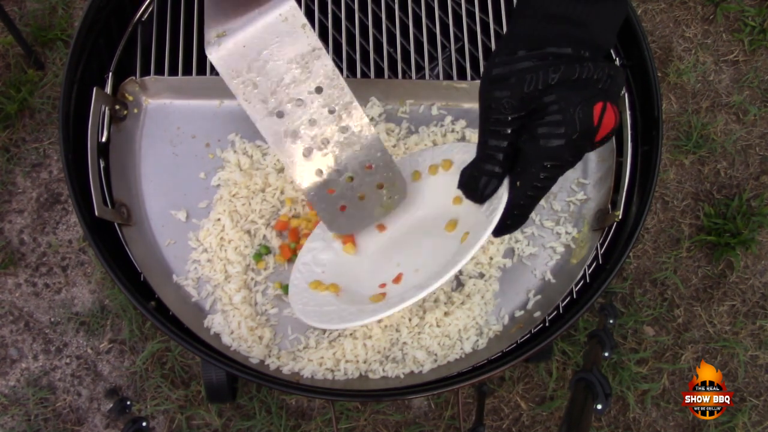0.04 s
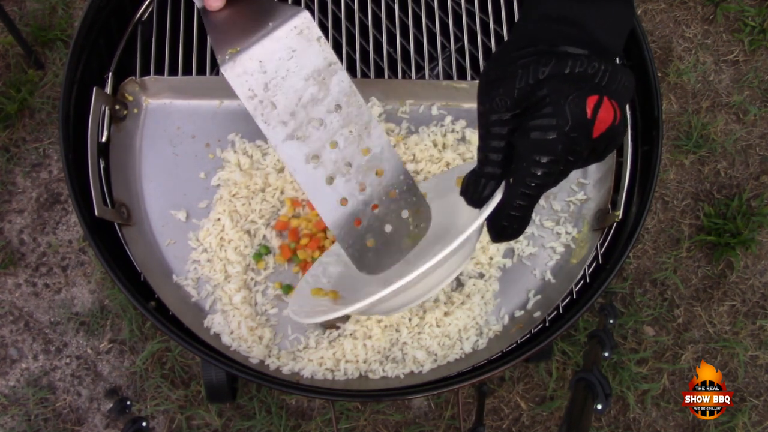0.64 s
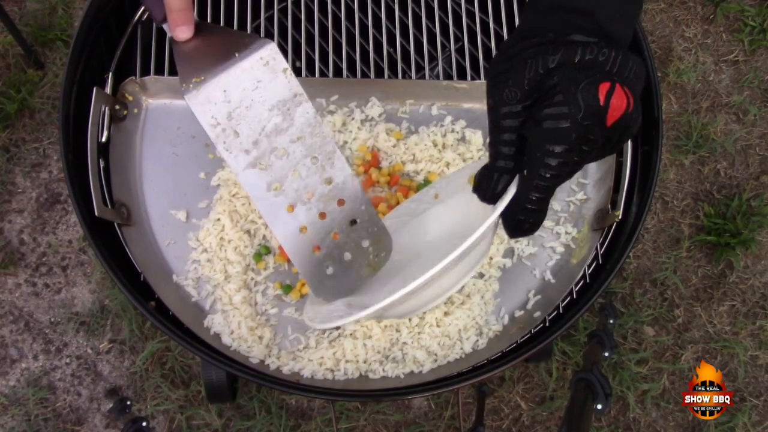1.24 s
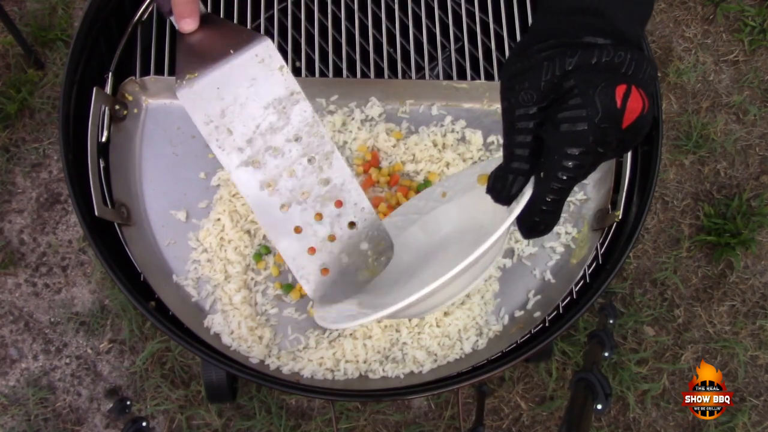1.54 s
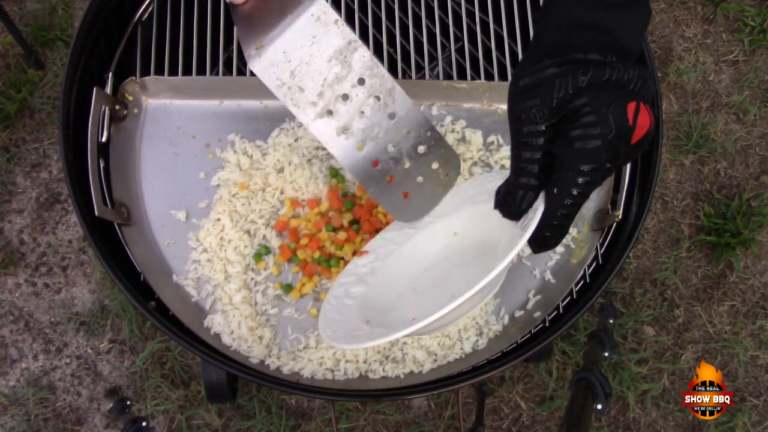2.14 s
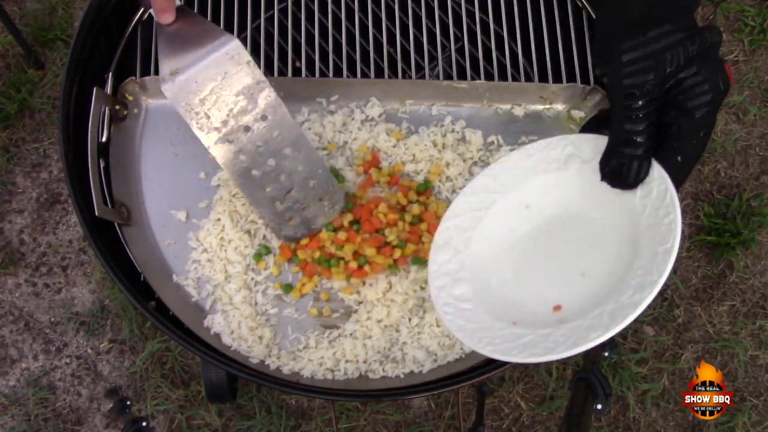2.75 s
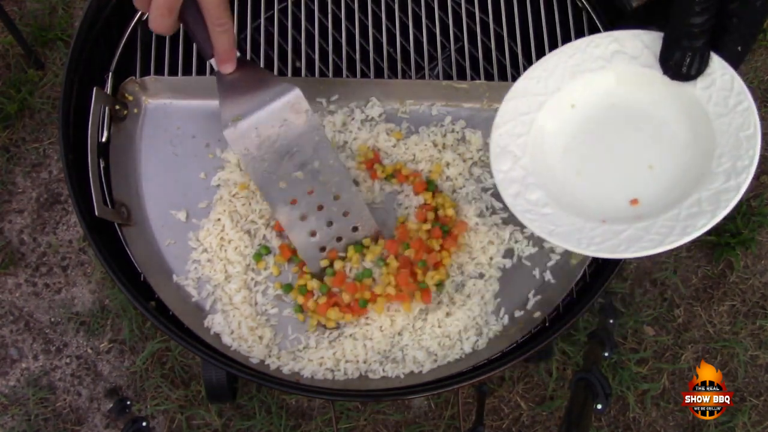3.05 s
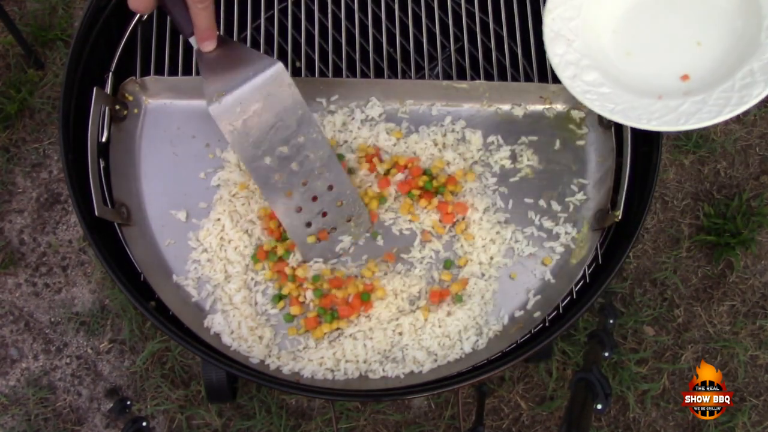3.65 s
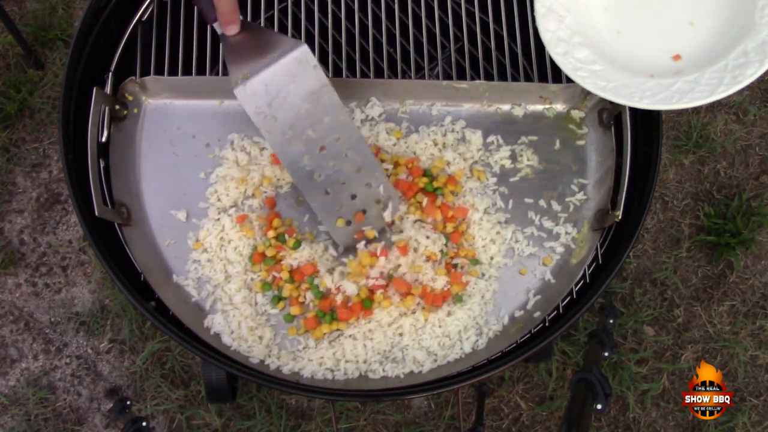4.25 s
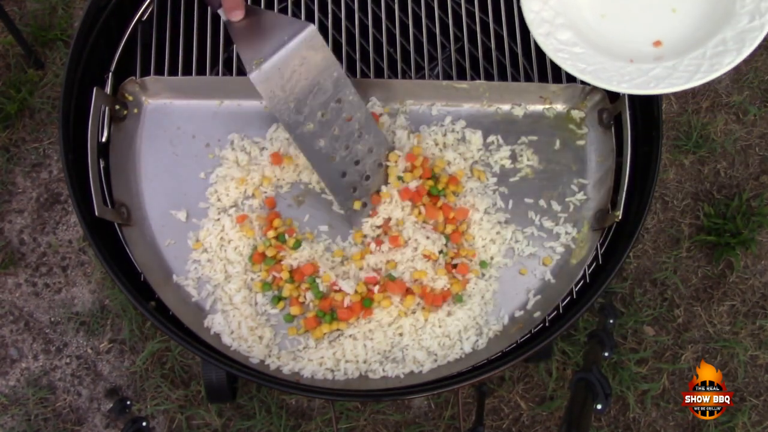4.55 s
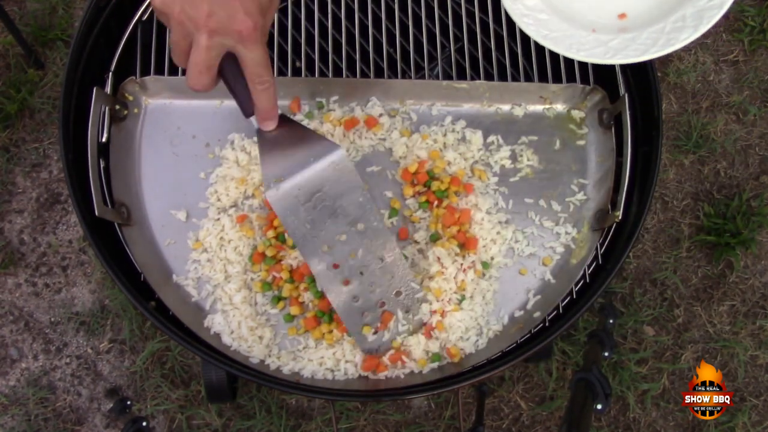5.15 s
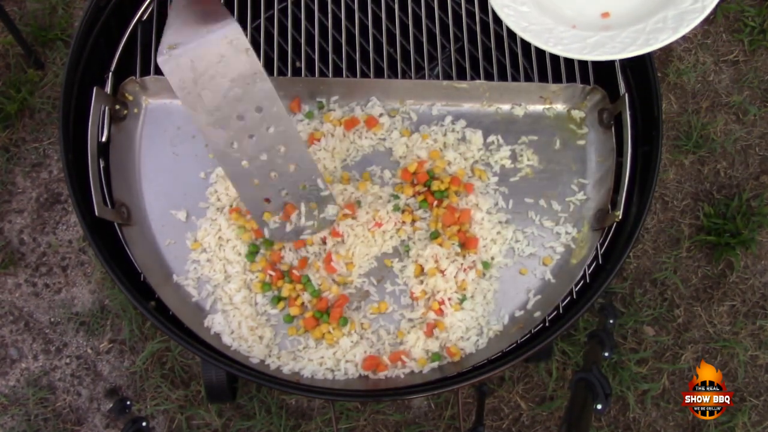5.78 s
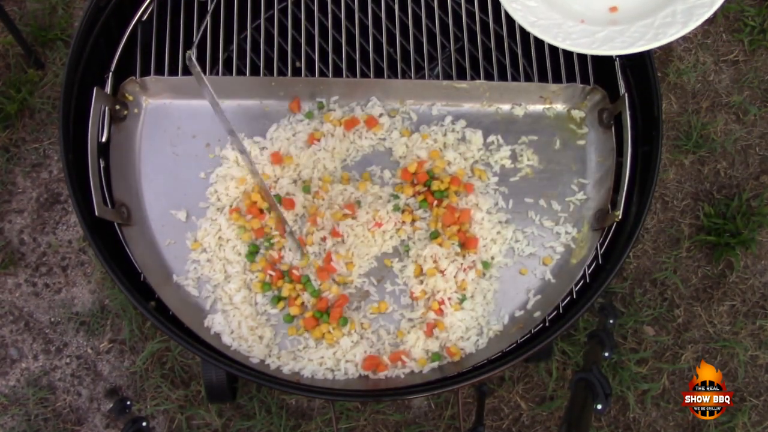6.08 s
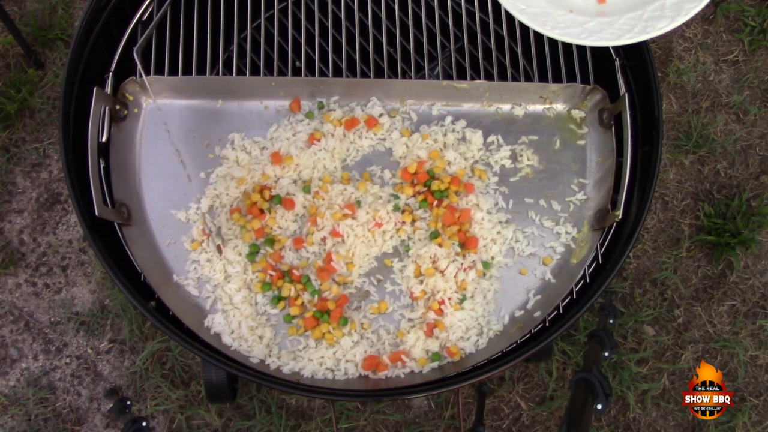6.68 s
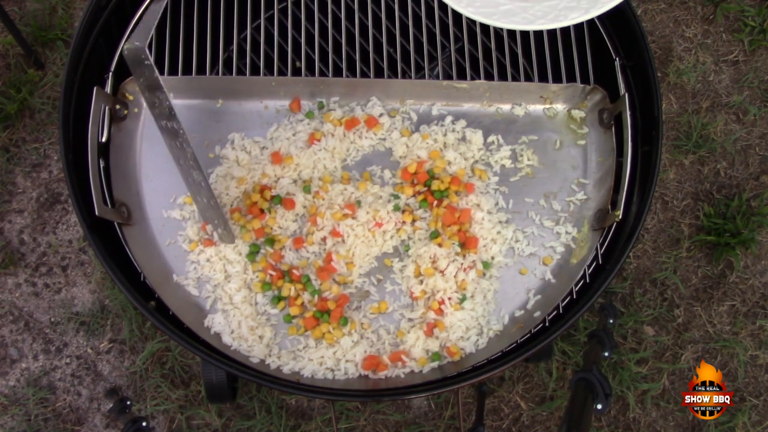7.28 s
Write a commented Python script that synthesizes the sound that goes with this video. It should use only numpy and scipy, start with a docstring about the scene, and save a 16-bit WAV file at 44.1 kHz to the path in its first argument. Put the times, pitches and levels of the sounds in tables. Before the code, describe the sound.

Rice sizzles softly on a steel griddle throughout, a fine crackling hiss heard close by outdoors over a low rumble, a distant wash and a faint hum. From about 0.2 to 2.6 seconds a steel turner scrapes vegetables off a china plate in six strokes. Each lands with a clink, most dragging briefly and flicking off the rim, so steel and china ring. The first squeaks slightly, and the sharpest come near 0.7 and 1.6 seconds. From about 3 to 6 seconds the turner stirs the food much more quietly: rice rustles, the blade rasps lightly on bare steel, the sizzle flares with each push and oil spits in small ticks. From about 6.6 to 7.2 seconds the turner raps five times in quick, even succession on the griddle, making loud metallic clanks with a short ring.

```python
"""Outdoors, over a low rumble and a faint hum, rice sizzles softly on a steel griddle.
First a steel turner scrapes diced vegetables off a china plate in six clinking strokes: the blade
lands, drags and flicks off the rim, and steel and china ring. From about 3 s it stirs them into
the rice, which rustles while wet food on hot steel makes the sizzle flare and the oil spits.
Last, from about 6.6 s, the turner raps five times on the griddle, which clanks and rings."""
import sys
import numpy as np
from scipy import signal
from scipy.fft import rfft, irfft, next_fast_len
from scipy.io import wavfile
from scipy.ndimage import map_coordinates

SR = 44100
rng = np.random.default_rng(int(sys.argv[2]) if len(sys.argv) > 2 else 0)


def wrap_up_sound(samples):
    """Save the sound to the file named by the first command line argument, as 16-bit audio."""
    columns = np.atleast_2d(samples).T
    # keep every value between -1 and 1, then stretch to whole-number steps
    tamed = np.clip(columns, -1, 1)
    steps = np.round(tamed * 32767).astype(np.int16)
    wavfile.write(sys.argv[1], SR, steps)


N = 322812
TIME = np.arange(N) / SR  # seconds since the scene began
AGE = np.arange(SR * 3 // 5) / SR  # seconds since one short sound began
ONSET = SR // 100  # a hit's strength is set over its first 10 ms
TOP_HZ = 15900

# The blade lands on the plate: t/s, level/dB, chatter/s, thud/dB, presence/dB, brightness/dB,
# plate ring/dB. Presence is the treble near 4 kHz, brightness the treble above it.
BLADE_LANDINGS = [(0.2166, -19.5, .018, 6, 4, 9, -6), (0.3585, -23, 0.009, -1, 10, 1.5, -8.5),
                  (0.7173, -8, 0.0073, 8, -5, -1, 4.5), (.803, -22.5, 0.013, 10, 9, -6, 17),
                  (0.8425, -39.5, .0014, 21, -11, -21, -27), (1.1919, -15, 0.0054, 8, -8, -6, -25),
                  (1.597, -11, 0.00075, -0.5, 5, -6.5, 1.5), (2.0597, -19, .0072, 1, -7, 2, 4),
                  (2.484, -20.5, 0.014, -1.5, 4.5, 7.5, -9)]
# The edge drags across the plate: t/s, length/s, level/dB, thud/dB, brightness/dB
EDGE_DRAGS = [(0.247, 0.016, -30.5, 11, -7), (0.289, 0.099, -43.5, -7, 3), (1.215, .045, -28.5, 3, -17),
              (1.292, .04, -27, 2, 6), (1.627, 0.067, -26, 1.5, 6), (2.084, 0.032, -25, 1, 4),
              (2.127, 0.068, -25.5, -13, 1.5), (2.53, 0.03, -23.5, -25, 9)]
# The bare edge catches on the glaze: t/s, level/dB
EDGE_CATCHES = [(1.2838, -25), (1.3135, -20.5), (1.6562, -22.5), (2.0725, -17.5), (2.5225, -20)]
# The blade flicks off the rim and rings freely: t/s, level/dB
RIM_FLICKS = [(.3745, -30.5), (.738, -27.5), (1.3345, -25.5), (1.6967, -22), (2.1808, -23.5), (2.199, -28),
              (2.5725, -22)]
# Ringing tones of the free blade: f/Hz, level/dB, ring time/s (the time to fade by 60 dB)
BLADE_TONES = [(657, -37, .45), (764, -25, .68), (985, -29, .35), (1270, -20, .12), (1410, -23.5, .28),
               (1622, -21, .13), (1863, -9.5, .28), (2066, -10, .09), (2372, 0, .13), (3628, -20.5, .17),
               (3957, -24, .19), (4145, -14, .1), (4499, -20, .18), (4791, -26, .24), (5130, -13, .14),
               (5389, -17, .13), (5868, -20, .13), (6169, -25, .23), (6595, -21, .2), (6832, -15, .16),
               (7062, -19, .15), (7323, -14, .14), (7524, -19, .21), (7870, -22, .2), (8350, -24, .2),
               (8813, -21, .17), (9338, -21, .12), (10368, -22, .1), (12489, -23, .09), (15042, -23, .1)]
# Ringing tones of the plate, held in a glove: f/Hz, level/dB, ring time/s
PLATE_TONES = [(1272, -12, .08), (2063, -3, .09), (2590, -5, .06), (2730, -8, .05), (4140, -11, .06),
               (5125, 0, .11), (5255, -2, .09), (6790, -7, .08), (9021, -10, .1)]
def scrapes(bounce_s=0.018, bounce_loss_db=13.5):
    """Strokes over the plate: the blade lands, bounces, drags, catches and flicks off the rim."""
    out = np.zeros(N)
    plate, blade = ringing_tones(PLATE_TONES), ringing_tones(BLADE_TONES)
    landing_times = [row[0] for row in BLADE_LANDINGS]
    presses = [(pressed_blade(), plate, blade) for _ in landing_times]  # a new spot each landing

    def last_press(s):
        return presses[np.searchsorted(landing_times, s) - 1]

    for parts, (s, db, chatter_s, *tone, plate_db) in zip(presses, BLADE_LANDINGS):
        add(out, s, amp(db) * clink(parts, chatter_s, *tone, plate_db, blade_db=-11.5))
        bounce = clink(parts, 0.0032, *tone, plate_db=-1.5, blade_db=-14)
        add(out, s + bounce_s, amp(db - bounce_loss_db) * bounce)
    for s, length, db, thud_db, bright_db in EDGE_DRAGS:
        add(out, s, amp(db) * drag(last_press(s), length, thud_db, bright_db))
    for s, db in EDGE_CATCHES:
        catch = clink(last_press(s), chatter_s=0.005, thud_db=1, presence_db=16, bright_db=8,
                      plate_db=-13, blade_db=2)
        add(out, s, amp(db) * catch)
    for s, db in RIM_FLICKS:
        flick = clink(last_press(s), chatter_s=0.01, thud_db=-19, presence_db=6, bright_db=2.5,
                      plate_db=-15, blade_db=8.5)
        add(out, s, amp(db) * flick)
    return out


# Colour (how strong each pitch is) of the clattering blade: f/Hz, level/dB
CLATTER_COLOUR = [(100, -31), (250, -22), (480, -14.5), (800, -9), (1050, -7), (1280, -5.5), (2100, 2),
                  (2650, -1.5), (3200, -13), (4100, -7.5), (5400, -7.5), (9000, -16.5), (16000, -19)]
# Colour of the plate knocking on its support: f/Hz, level/dB
THUD_COLOUR = [(100, -29), (220, -15), (370, -12), (480, 0.5), (600, -6.5), (800, 7), (1000, 1), (1270, 4),
               (2000, 9), (4000, -35)]
def clink(parts, chatter_s, thud_db, presence_db, bright_db, plate_db, blade_db, grit_db=-2.5):
    """One touch of blade on plate: the blade clatters, the plate thuds, china and steel ring on."""
    sheet_tones, plate, blade = parts
    sheet = unit(irfft(sheet_tones * random_phases(len(sheet_tones))))
    sheet *= hold_then_fade(chatter_s * 0.91, ring_s=0.077)
    # Uneven slips of the edge sound gritty and also shake the whole plate.
    slips = unit(rng.standard_normal(len(AGE)) * amp(3.3 * rng.standard_normal(len(AGE))))
    slips *= hold_then_fade(chatter_s, ring_s=0.06)
    grit = coloured(slips, [(800, -1), (2500, 9), (5000, 3)])
    thud = unit(coloured(slips, THUD_COLOUR), ONSET)
    clatter = unit(coloured(sheet + amp(grit_db) * grit, CLATTER_COLOUR), ONSET)
    china = amp(plate_db) * strike(plate, scatter_db=2.5)
    steel = amp(blade_db) * strike(blade, scatter_db=3)
    ring = (china + steel) * rise(0.00046)
    # A soft landing on food is dull, a bare edge is bright.
    treble = [(2500, 0.015), (4200, 0.51 * presence_db), (8500, 1.01 * bright_db)]
    return unit(coloured(clatter + ring, treble), ONSET) + amp(thud_db - 15.5) * thud


def pressed_blade(count=56):
    """The crowded tones of a thin steel sheet, as a spectrum; they depend on where it is pressed."""
    spectrum = np.zeros(len(AGE) // 2 + 1, complex)
    hz = (np.arange(count) + 4 + rng.random(count)) * TOP_HZ / count
    spectrum[(hz * len(AGE) / SR).astype(int)] = amp(3 * rng.standard_normal(count))
    return spectrum


def drag(parts, length, thud_db, bright_db, points=3, slips_per_s=115, scatter_db=2.5):
    """A few points of the edge take turns to stick and slip; each slip is a tiny clink."""
    out = np.zeros(len(AGE))
    for point in range(points):
        jitter = rng.random(len(AGE) // ONSET)
        when = (np.arange(len(jitter)) * points + point + jitter - jitter[0]) / slips_per_s
        sizes = amp(scatter_db * rng.standard_normal(len(when))) * (when < length)
        slips = np.bincount((when * SR).astype(int), sizes, len(AGE))[:len(AGE)]
        touch = clink(parts, chatter_s=0.0018, thud_db=thud_db, presence_db=0.75 * bright_db,
                      bright_db=bright_db, plate_db=-10, blade_db=-2, grit_db=-9)
        out += signal.fftconvolve(slips, touch)[:len(AGE)]
    return unit(out, int(length * SR))


# The edge squeals on glaze or steel: t/s, length/s, f/Hz, level/dB
EDGE_SQUEALS = [(.215, 0.035, 2566, -28), (0.246, 0.086, 1503, -45), (.261, .031, 5160, -42),
                (.312, 0.046, 2540, -47), (.314, 0.049, 5480, -41.5), (3.613, 0.042, 2970, -50.5),
                (3.619, .05, 1430, -54.5)]
def squeals():
    """The edge sticks and slips so fast that it makes short, rough tones."""
    out = np.zeros(N)
    for s, length, hz, db in EDGE_SQUEALS:
        size = int(length * SR)
        pitch = hz * (1 + 0.014 * wobble(600)[:size])
        grip = amp(3 * wobble(400)[:size]) * signal.get_window(("tukey", 0.5), size)
        add(out, s, amp(db) * unit(grip * sine(pitch)))
    return out


# The blade raps on the griddle: t/s, level/dB
GRIDDLE_RAPS = [(6.591, -4), (6.745, -4), (6.871, -5), (7.013, -4), (7.159, -3.5)]
# Colour of the clank: f/Hz, level/dB
CLANK_COLOUR = [(71, -38), (120, -39), (272, -9), (698, -15), (1010, -12), (1140, -22), (1240, -8.5),
                (1620, -1.5), (2020, -5.5), (2240, -3), (2640, -19.5), (2990, -15), (4780, -20.5),
                (7820, -14.5), (16000, -37.5)]
# How long each part of the clank lasts: f/Hz, ring time/s
CLANK_RING_TIMES = [(250, 0.057), (1000, 0.15), (1800, 0.091), (3500, 0.26), (8000, 0.086), (15000, 0.049)]
# Ringing tones of the griddle under its load of rice: f/Hz, level/dB, ring time/s
GRIDDLE_TONES = [(313, -8, 0.076), (442, -11.5, 0.1), (1040, -10.5, 0.16), (1269, -3, 0.093),
                 (1400, -23, 0.067), (1565, -4, 0.22), (1793, -5, 0.23), (1750, -18, 0.12),
                 (2190, -0.5, 0.11), (2895, -13, 0.25), (3330, -17.5, 0.3), (7000, -4.5, 0.072),
                 (7570, -2, 0.069)]
# Colour of the kettle's after-ring: f/Hz, level/dB
KETTLE_COLOUR = [(200, -13.5), (700, -10.5), (1200, -12), (1750, 2.5), (2500, -9), (3200, -4), (4600, -18),
                 (7500, -11), (15000, -22)]
def raps():
    """The edge hits the griddle: a crack, a short ringing clank and a weak after-ring of the kettle."""
    out, griddle = np.zeros(N), ringing_tones(GRIDDLE_TONES)
    crack = 1 + 0.49 * fade(0.021)
    for s, db in GRIDDLE_RAPS:
        blow = dying_noise(CLANK_RING_TIMES) * crack
        clank = unit(coloured(blow, CLANK_COLOUR), ONSET)
        ring = strike(griddle, scatter_db=1.2) * rise(0.001)
        after_ring = noise(KETTLE_COLOUR, len(AGE)) * fade(0.66) * rise(0.0032)
        add(out, s, amp(db - 13) * clank + amp(db - 14.5) * ring + amp(db - 29.5) * after_ring)
    return out


# The sharpest oil spits and touches of the pan: t/s, level/dB
SHARP_TICKS = [(0.4143, -25.5), (0.469, -30), (2.6962, -29.5), (2.9113, -27), (3.1146, -31),
               (3.1907, -20.5), (3.439, -22.5), (3.974, -27), (4.2116, -22.5), (4.8195, -21.5),
               (4.8646, -24.5), (4.88, -26), (4.9801, -27), (5.8855, -27.5), (6.106, -29), (6.3684, -24.5)]
# Colour of one tick: f/Hz, level/dB
TICK_COLOUR = [(300, -22), (1000, -8), (2200, -1), (3200, -3.5), (4400, -8.5), (5500, 3), (8000, 0),
               (12000, -4), (16000, -14)]
def spits(small_count=22):
    """Oil spits and the blade touches the pan: single ticks, some thin and some fuller."""
    out = np.zeros(N)
    # Smaller ticks come at random moments and follow the strength of the sizzle.
    at = rng.integers(N, size=small_count)
    small_db = 20 * np.log10(sizzle_strength()[at]) + 22.5 + 2.5 * rng.standard_normal(small_count)
    envelope = (fade(0.0054) + 0.2 * fade(0.047)) * rise(0.00025)
    for s, db in [*SHARP_TICKS, *zip(at / SR, small_db)]:
        burst = rng.standard_normal(len(AGE)) * envelope
        fullness_db = 5 + 3 * rng.standard_normal()
        tick = coloured(burst, TICK_COLOUR, [(2000, fullness_db), (4500, 0)])
        add(out, s, amp(db - 16.5) * unit(tick, ONSET))
    return out


# The turner pushes through the food: t/s, length/s, sizzle flare/dB, rice rustle/dB
TURNER_PUSHES = [(2.903, .33, -47.5, -60), (3.6, 0.15, -52.5, -77), (3.857, 0.45, -50.5, -56),
                 (4.703, 0.33, -53, -66), (5.067, 0.42, -54, -56.5), (5.94, 0.23, -62, -58.5)]
# Something slides on the bare griddle: t/s, length/s, level/dB
STEEL_RUBS = [(0, .2, -54), (3.61, 0.063, -51.5), (4.97, 0.32, -54.5), (5.342, .18, -47), (5.65, 0.35, -58)]
# Colour of the rubbed griddle: f/Hz, level/dB
RASP_COLOUR = [(600, -25), (1200, -7), (1750, 0), (2300, -6), (3200, -5), (3800, -4.5), (4600, -31),
               (12000, -46)]
def stirring():
    """Pushed rice rustles and the griddle bumps; sliding on its bare steel makes it rasp."""
    push = sum(amp(db) * swell(s, length, rise_s=0.047, fall_s=0.14)
               for s, length, _, db in TURNER_PUSHES)
    rustle = noise([(100, -13.5), (280, -0.5), (700, 1.5), (1000, 1),
                    (1500, -19), (3200, -19), (6000, -33)])
    pressure = sum(amp(db) * swell(s, length, rise_s=0.0055, fall_s=0.068)
                   for s, length, db in STEEL_RUBS)
    friction = rng.standard_normal(N) * amp(2.5 * wobble(180))
    rasp = unit(coloured(friction, RASP_COLOUR))
    jolts = amp(4.3 * wobble(14))
    bumps = unit(jolts * noise([(15, -0.5), (45, 2), (90, -4), (200, -20), (500, -55)]))
    return push * (rustle + amp(-3.5) * bumps) + pressure * rasp


def sizzle_strength(rice_db=-56.5, vegetables_add_db=2):
    """The sizzle grows once the vegetables go in, and flares whenever wet food meets hot steel."""
    mixed_in = TIME > TURNER_PUSHES[0][0]
    steady = amp(rice_db + vegetables_add_db * mixed_in)
    flare_power = sum((amp(db) * swell(s, length, rise_s=0.009, fall_s=0.17)) ** 2
                      for s, length, db, _ in TURNER_PUSHES)
    return np.sqrt(steady ** 2 + flare_power)


# Colour of the frying hiss: f/Hz, level/dB
HISS_COLOUR = [(600, -7.5), (1000, -9), (1400, -6), (2300, 1), (3200, -7.5), (3650, 5), (4400, -6),
               (5400, 4), (7500, 1), (9000, -2.5), (13000, -3.5), (16000, -15)]
# Colour of the bursting bubbles: f/Hz, level/dB
CRACKLE_COLOUR = [(800, -3), (2200, 4), (3200, -10), (4400, 2.5), (5400, 5), (7500, 5), (9000, -1),
                  (13000, 0), (16000, -16)]
def sizzle(pops_per_s=260):
    """Countless tiny steam bubbles burst in the oil: a hiss with a fine crackle on top."""
    hiss = noise(HISS_COLOUR)
    sizes = amp(5 * np.minimum(rng.exponential(size=N), 3))
    pops = (rng.random(N) < pops_per_s / SR) * sizes
    bursts = signal.fftconvolve(pops, fade(0.0034))[:N]
    crackle = unit(coloured(bursts * rng.standard_normal(N), CRACKLE_COLOUR))
    flicker = amp(wobble(25))
    return sizzle_strength() * flicker * (amp(-1.03) * hiss + amp(-2.5) * crackle)


# Loudness of the distant wash of outdoor noise: t/s, level/dB
WASH_LEVELS = [(0, -54.5), (.6, -58), (1.6, -57), (1.85, -54), (2.25, -52.5), (2.6, -56.5), (3.6, -56.5),
               (6.5, -58), (6.9, -54), (7.32, -51)]
# Colour of that wash: f/Hz, level/dB
WASH_COLOUR = [(100, -15.5), (280, -1), (700, -1.5), (1000, -3), (1500, -6), (2200, -7), (3200, -13.5),
               (6000, -39)]
# Colour of the low rumble: f/Hz, level/dB
RUMBLE_COLOUR = [(10, -5), (25, 2.5), (55, -2), (90, -7), (160, -10), (300, -14), (700, -44)]
def outdoors(rumble_db=-57, hum_db=-66.5, hum_hz=119):
    """A slowly drifting distant wash, a low rumble and a faint wavering hum."""
    wash = amp(np.interp(TIME, *np.transpose(WASH_LEVELS))) * noise(WASH_COLOUR)
    gusts = amp(3 * wobble(10))
    rumble = amp(rumble_db) * unit(gusts * noise(RUMBLE_COLOUR))
    hum = amp(hum_db + 2 * wobble(4.9)) * unit(sine(hum_hz + 2 * wobble(11)))
    return wash + rumble + hum


def ringing_tones(table):
    """The fading tones of a struck object, one row each, starting with a total power of 1."""
    hz, db, ring_s = np.transpose(table)
    gains = amp(db) / np.linalg.norm(amp(db)) * np.sqrt(2)
    return gains[:, None] * np.exp(2j * np.pi * np.outer(hz, AGE)) * fade(ring_s[:, None])


def strike(tones, scatter_db):
    """Each blow lands on a new spot and shares its energy differently among the tones."""
    share = unit(amp(scatter_db * rng.standard_normal(len(tones))))
    return ((share * random_phases(len(tones))) @ tones).real


def random_phases(count):
    """A random starting point in each wave's cycle."""
    return np.exp(2j * np.pi * rng.random(count))


def sine(hz):
    """A pure tone that follows a changing pitch."""
    return np.sin(2 * np.pi * np.cumsum(hz) / SR)


def noise(colour, size=N):
    """Steady noise of strength 1 with the given colour."""
    return unit(coloured(rng.standard_normal(size), colour))


def dying_noise(ring_times):
    """A burst of noise in which each pitch range fades at its own speed."""
    hz, t, bands = signal.stft(rng.standard_normal(len(AGE)), SR, nperseg=128)
    decay = np.exp(-np.log(1000) * t / along(ring_times, hz)[:, None])
    return signal.istft(bands * decay, SR, nperseg=128)[1][:len(AGE)]


def coloured(x, *colours):
    """Filter a sound through one or more curves of (f/Hz, level/dB) points."""
    size = 2 * next_fast_len(len(x) // 2 + 2048)
    hz = np.fft.rfftfreq(size, 1 / SR)
    cepstrum = irfft(np.log(amp(sum(along(colour, hz) for colour in colours))))
    # Folding onto the first half makes the filter ring only after a hit, never before.
    cepstrum[1:size // 2] *= 2
    cepstrum[size // 2 + 1:] = 0
    return irfft(rfft(x, size) * np.exp(rfft(cepstrum)))[:len(x)]


def along(points, hz):
    """Read between (f/Hz, value) points, with octaves evenly spaced."""
    point_hz, values = np.transpose(points)
    return np.interp(np.log(hz + 1), np.log(point_hz), values)


def wobble(rate):
    """A smooth curve through rate random values a second."""
    return map_coordinates(rng.standard_normal(int(N * rate / SR) + 4), [TIME * rate])


def rise(rise_s):
    """Climb from 0 towards 1 to soften a sound's start."""
    return 1 - np.exp(-AGE / rise_s)


def fade(ring_s):
    """Die away, falling 60 dB in ring_s seconds."""
    return np.exp(-np.log(1000) * AGE / ring_s)


def hold_then_fade(length, ring_s):
    """Stay at full strength for length seconds, then die away."""
    return np.minimum(1, np.exp(-np.log(1000) * (AGE - length) / ring_s))


def swell(s, length, rise_s, fall_s):
    """Rise at s seconds, hold until s + length, then die away."""
    return np.clip((TIME - s) / rise_s, 0, 1) * np.exp(-np.maximum(TIME - s - length, 0) / fall_s)


def amp(db):
    """Turn decibels into a multiplier."""
    return 10 ** (np.asarray(db) / 20)


def unit(x, size=None):
    """Scale to an average strength (rms) of 1, over the first size samples if given."""
    return x / np.sqrt(np.mean(x[:size] ** 2) + 1e-20)


def add(track, s, sound):
    """Mix a sound into the track at s seconds."""
    part = track[round(s * SR):][:len(sound)]
    part += sound[:len(part)]


def scene():
    """All the sources in one channel, heard close by in the open air."""
    return (scrapes() + squeals() + raps() + spits() + sizzle() + stirring() + outdoors())[None]


def record(dry):
    """Round off the highest peaks and cut the treble above TOP_HZ."""
    rounded = dry / (1 + np.abs(dry) ** 6) ** (1 / 6)
    size = next_fast_len(N + SR)
    treble_cut = np.clip((TOP_HZ - np.fft.rfftfreq(size, 1 / SR)) / 200 + 0.5, 0, 1)
    return irfft(rfft(rounded, size) * treble_cut, size)[:, :N]


dry = scene()
out = record(dry)
wrap_up_sound(out)
```